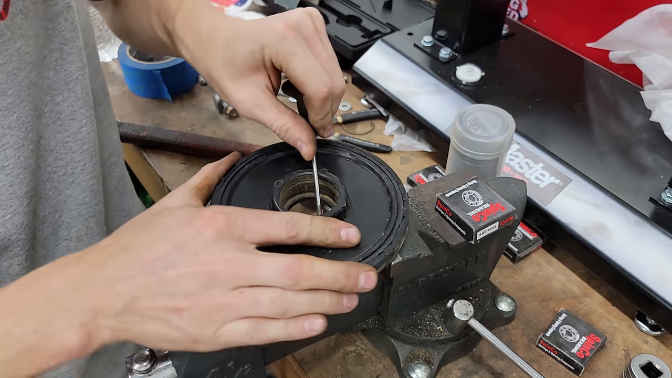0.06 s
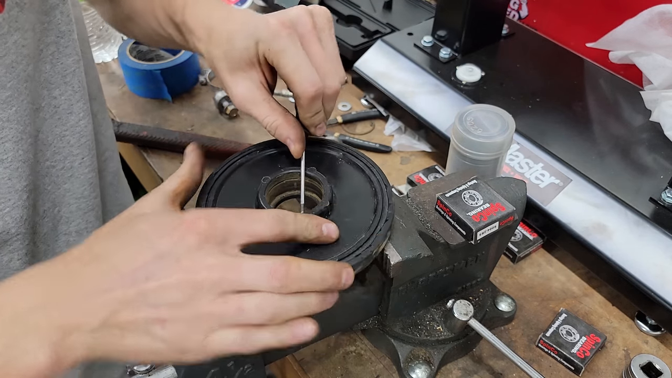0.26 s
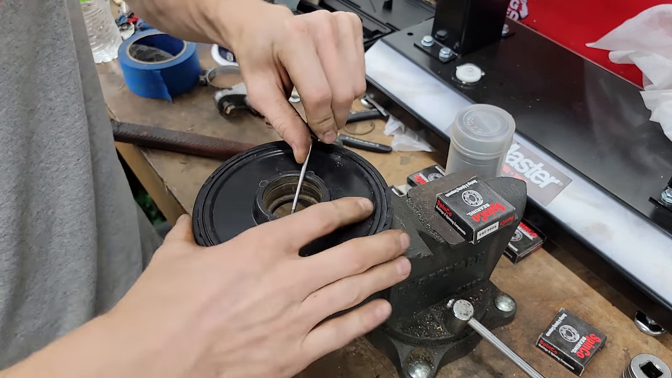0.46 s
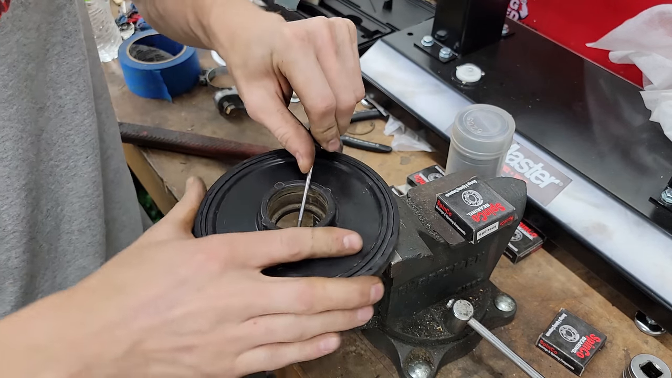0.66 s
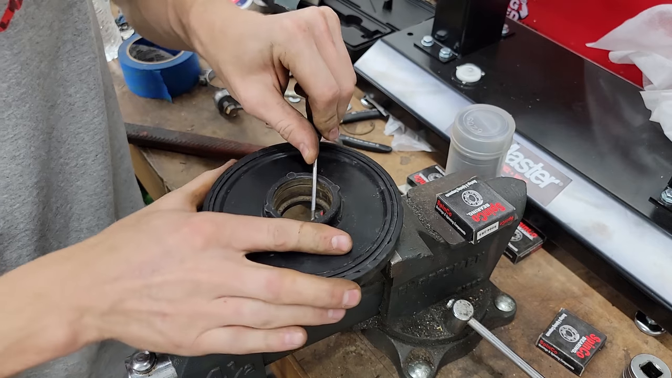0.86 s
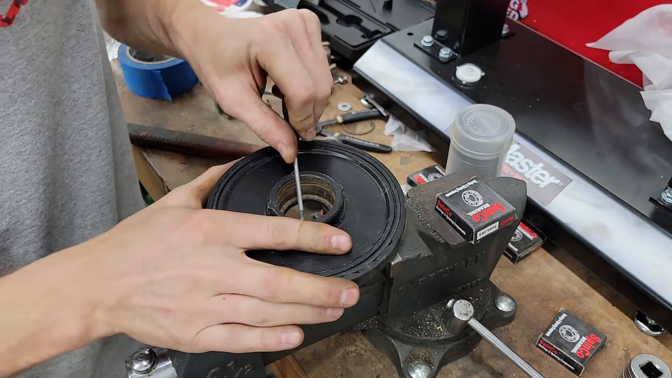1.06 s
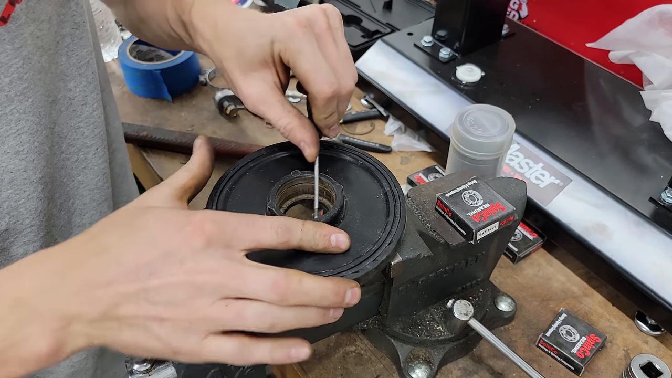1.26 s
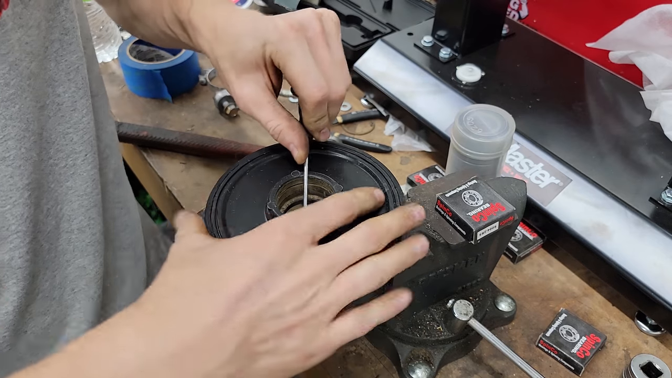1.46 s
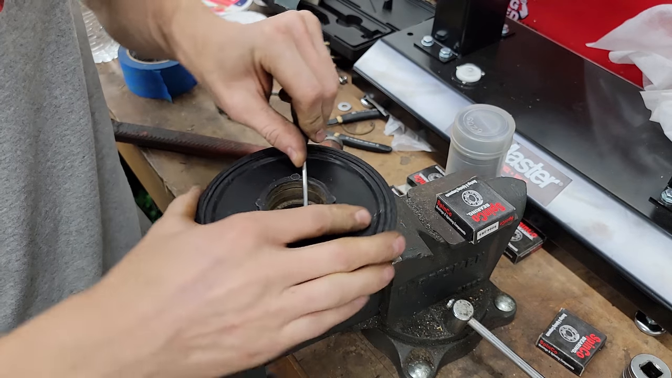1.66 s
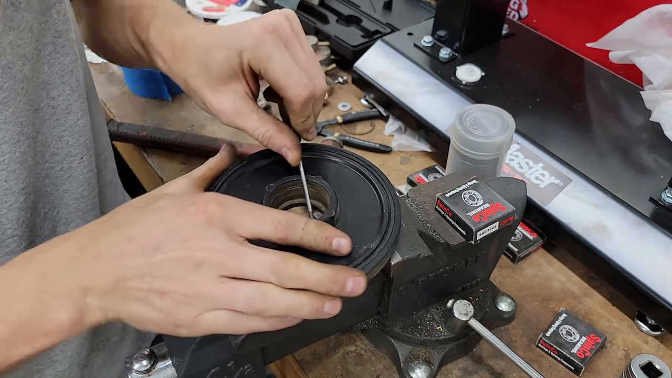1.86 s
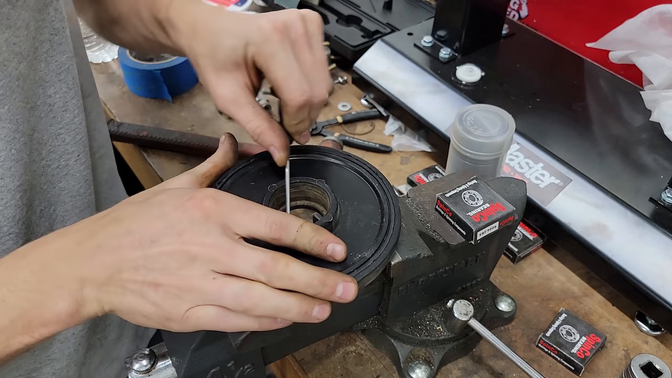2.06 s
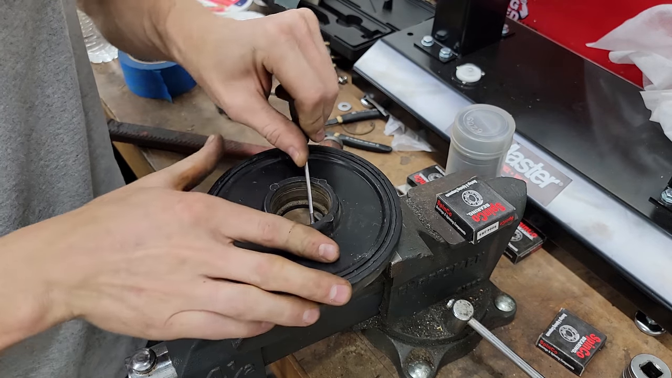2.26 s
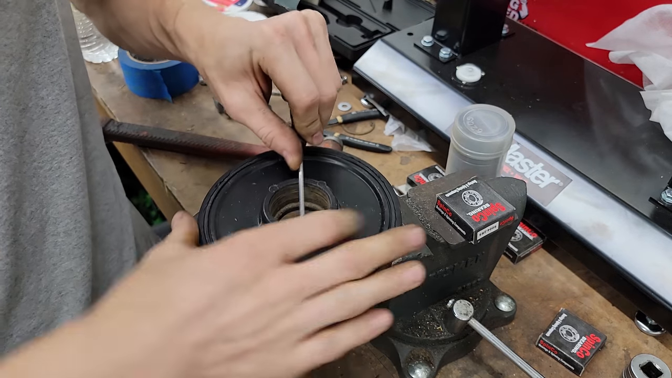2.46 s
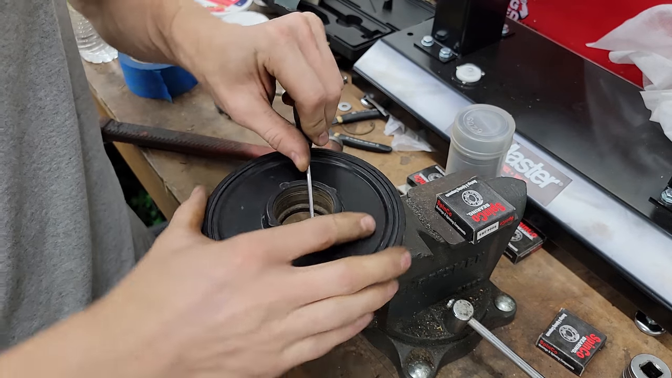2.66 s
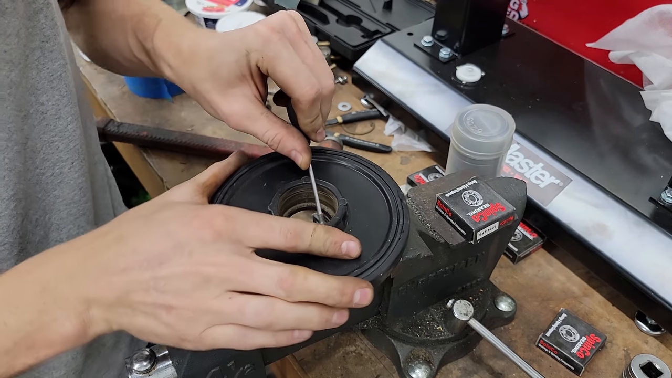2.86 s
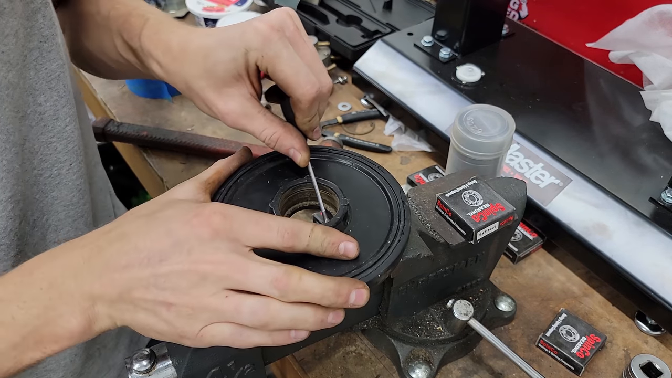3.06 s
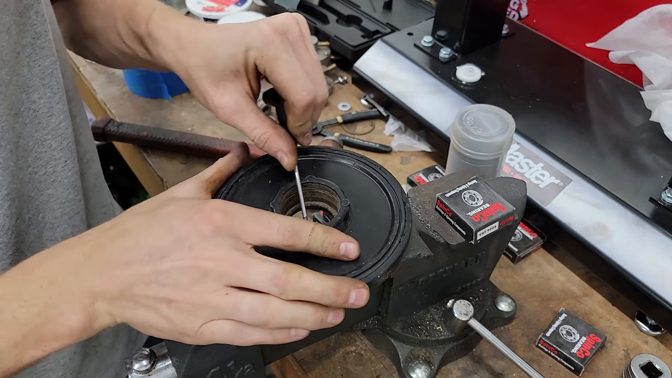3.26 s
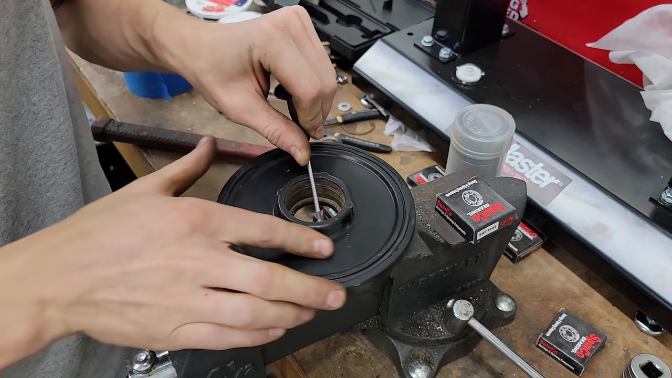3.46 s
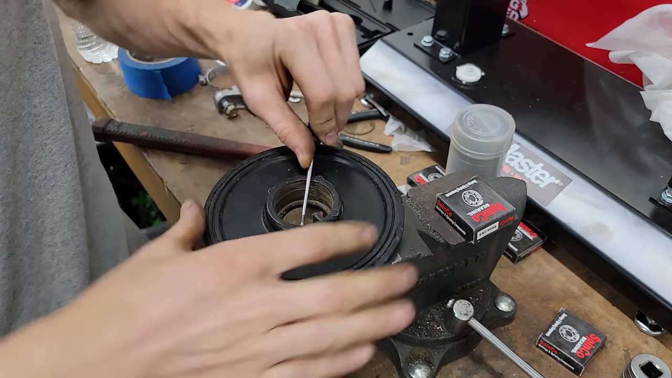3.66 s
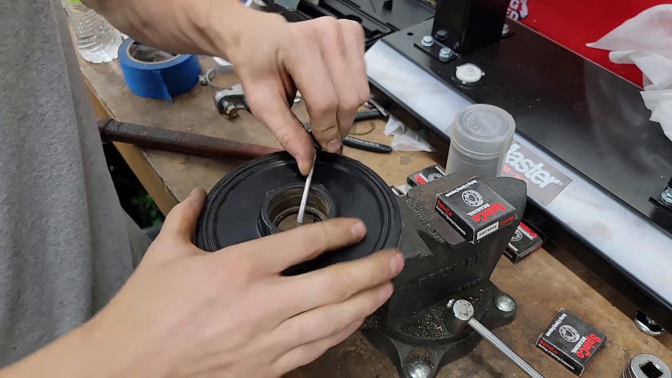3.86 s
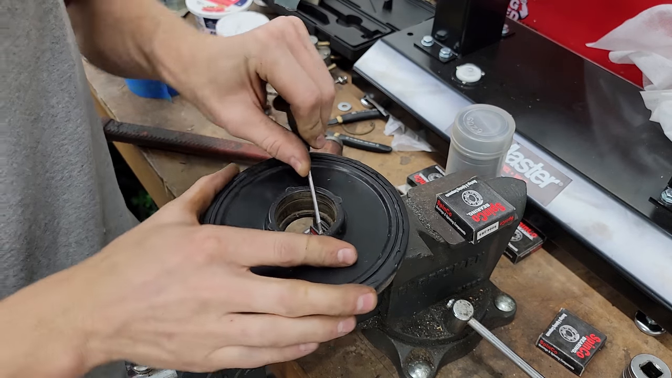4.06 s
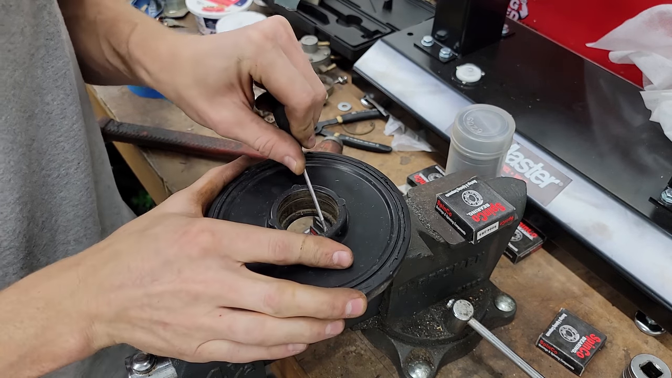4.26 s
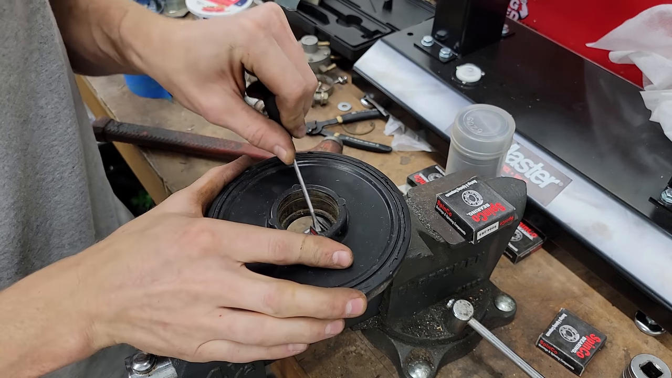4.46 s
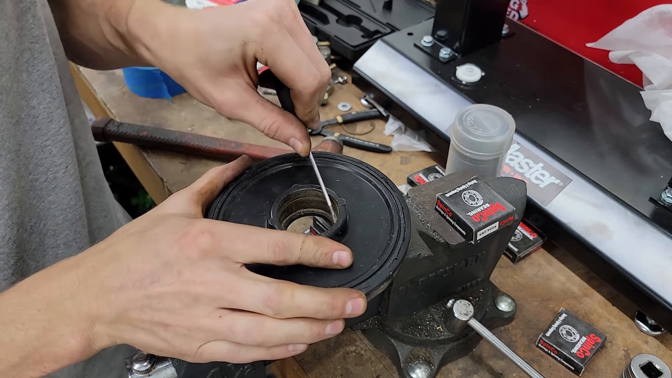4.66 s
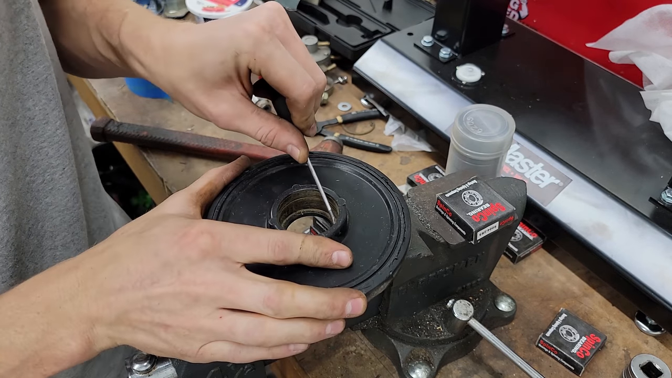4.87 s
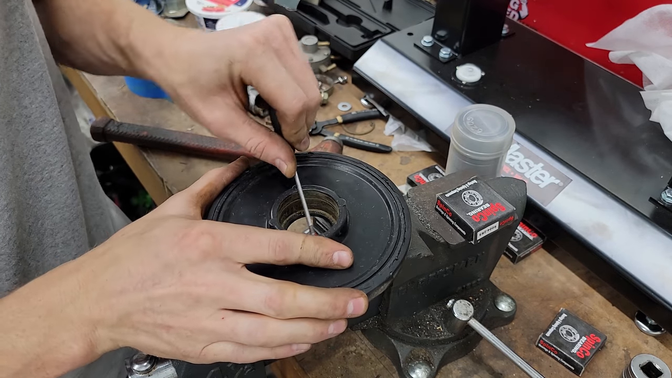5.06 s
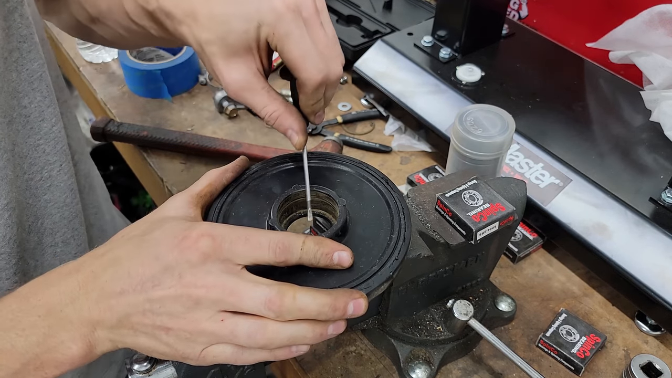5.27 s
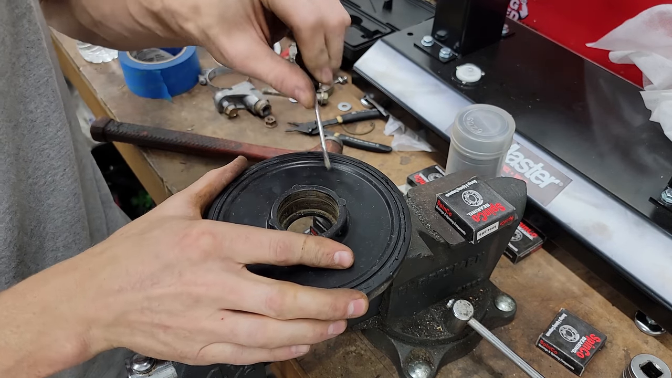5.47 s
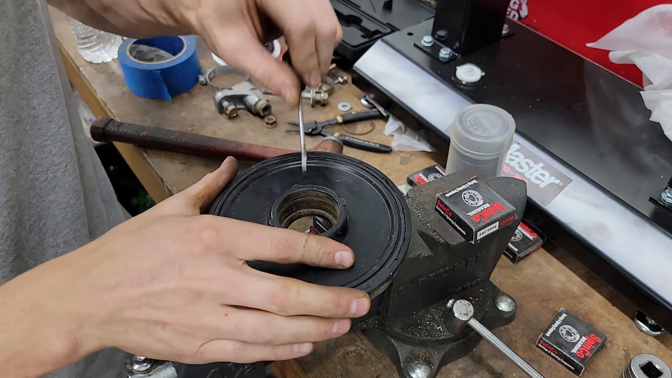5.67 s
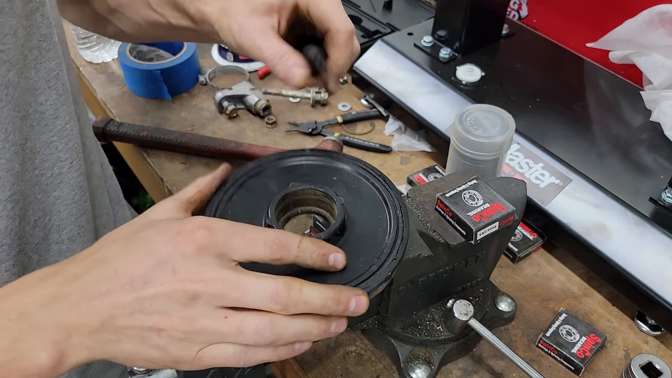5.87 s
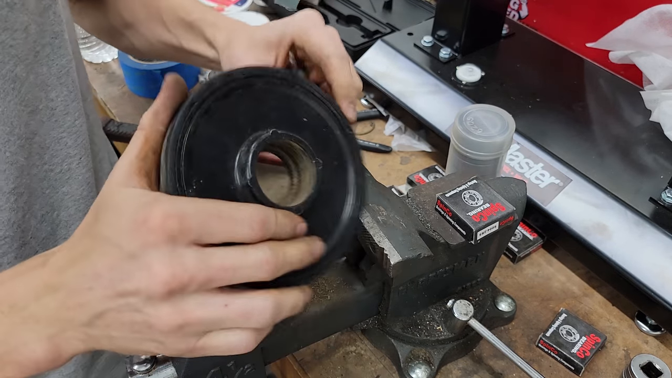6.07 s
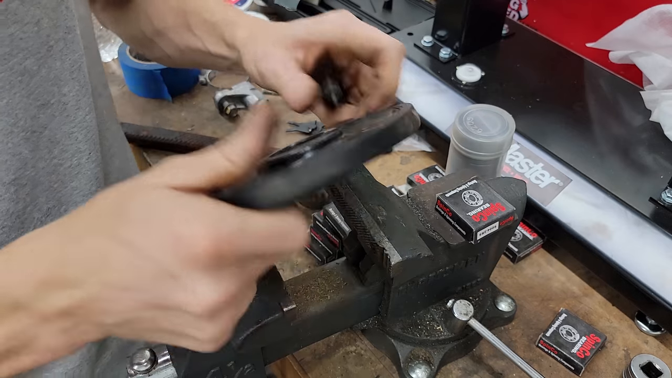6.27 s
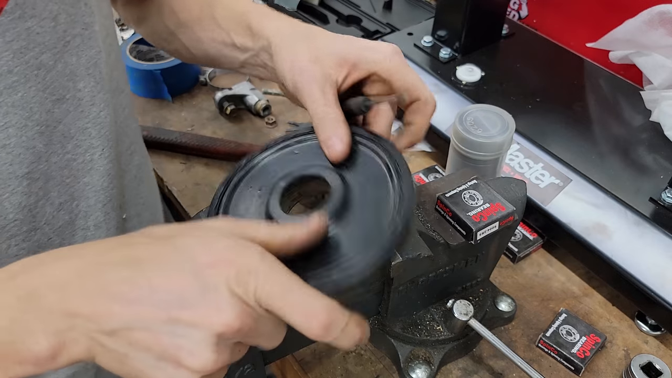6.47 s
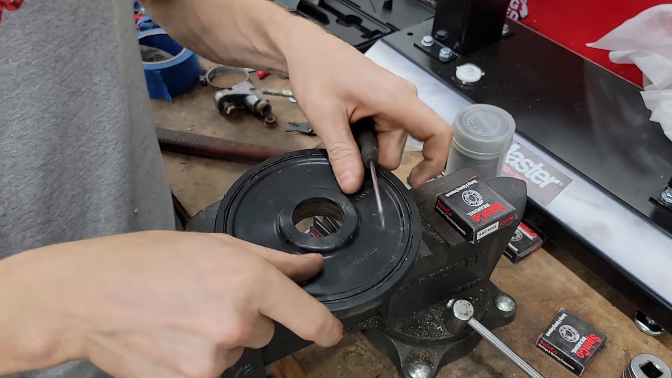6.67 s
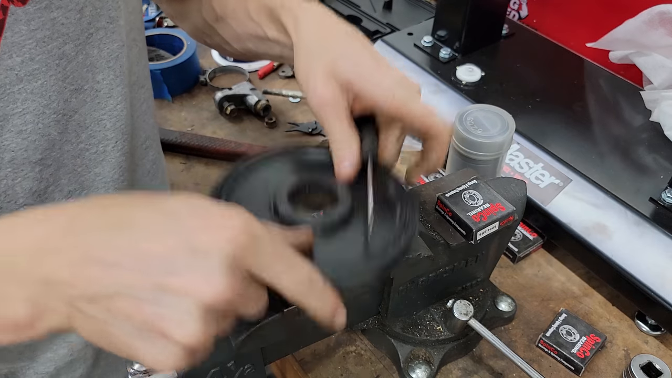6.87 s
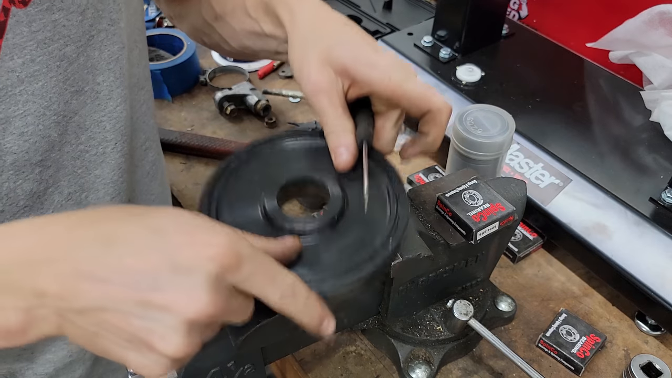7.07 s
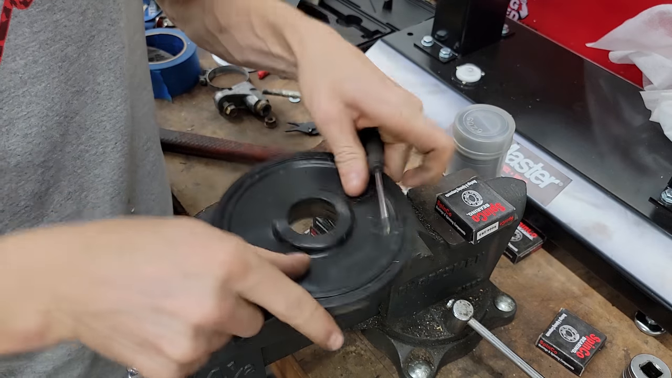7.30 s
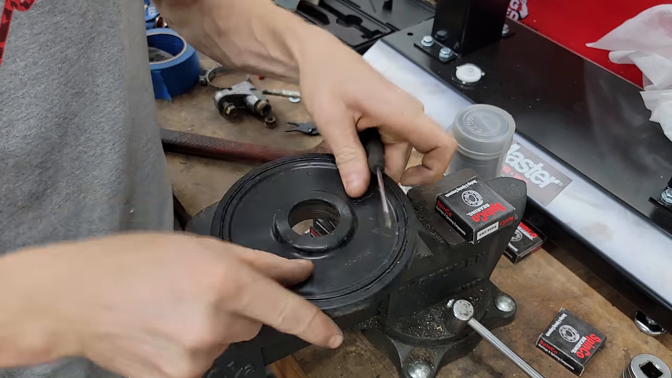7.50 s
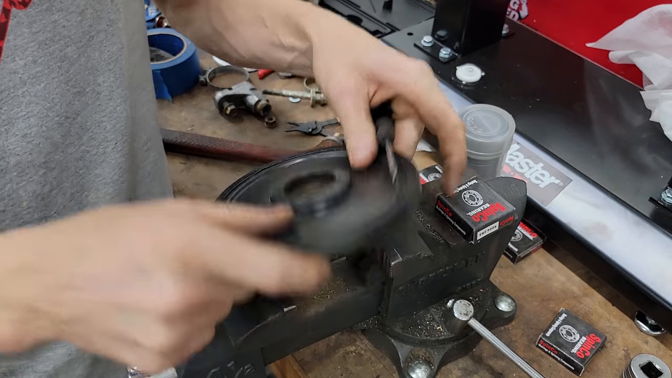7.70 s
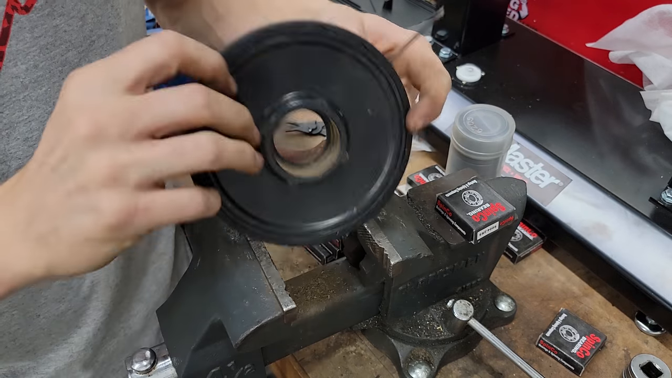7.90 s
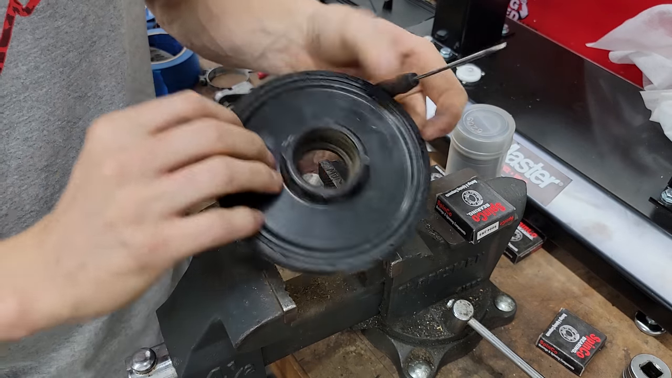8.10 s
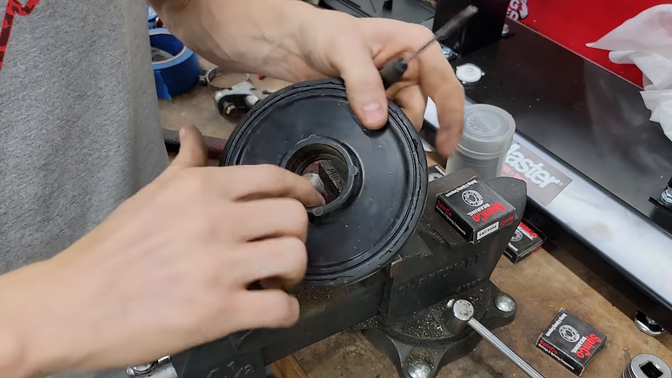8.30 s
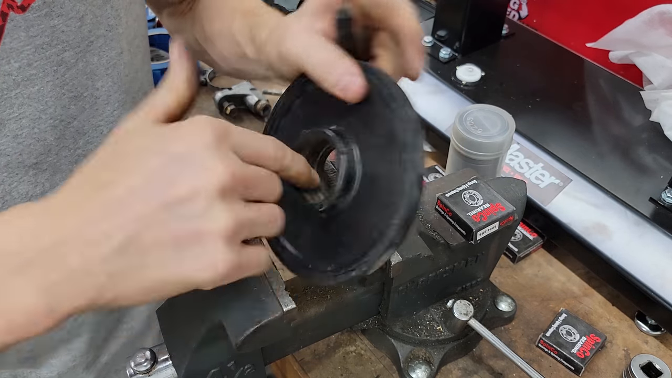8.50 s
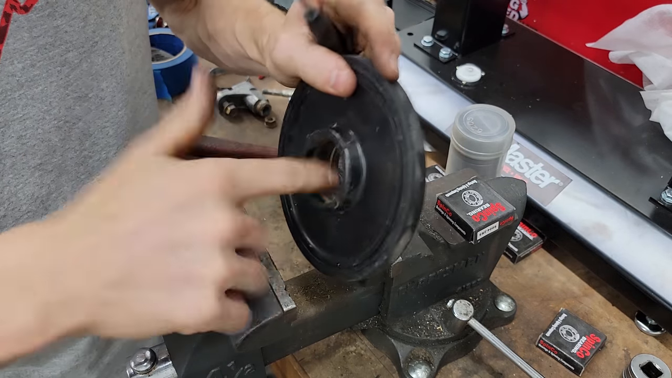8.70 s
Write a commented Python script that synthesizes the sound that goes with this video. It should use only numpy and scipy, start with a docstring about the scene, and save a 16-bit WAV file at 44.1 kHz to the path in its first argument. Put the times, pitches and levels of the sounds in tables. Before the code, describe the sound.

A quiet, echoing workshop with low rumble and faint hiss, heard close in stereo. From 0 to 4 seconds a screwdriver tip drags round a heavy wheel's greasy bore: soft low grinding strokes, thin hissy scuffs and small ticks, clearer at 0.16 and 1.93. Dull bumps come at 0.37 and 1.66. A muffled distant engine drones around 180 hertz from 0.2, pauses briefly near 1.5, drops in pitch at 2 and fades after 3. Sparse ticks, scuffs and faint metallic rings continue to 5.2, with a thump at 5.0. Two bright shank taps ring at 5.5 and 5.7. Fingers whisper around 6.1 to 6.4, then the wheel clanks on the vise at 6.48. Four hard, loud knocks with tight clattering contacts and bench boom land at 6.88, 7.08, 7.28 and 7.47, echoing about a second. Soft thumps at 7.77 and 8.29 precede dry finger slides to the end.

```python
"""In an echoing workshop, a screwdriver scrapes and ticks round the greasy bore of a heavy idler wheel.
A hand turns the wheel on a bench vise; the shank taps the hub twice, then the wheel is knocked four times.
Knocks, taps and ticks are short cracks plus ringing modes; scrapes and fingers are noise made of tiny slips.
A far engine, a sum of wavering sine waves over a rumble, drones and slows down; steady noise is the air."""
import sys
import numpy as np
from scipy import signal
from scipy.fft import rfft, irfft, next_fast_len
from scipy.io import wavfile
from scipy.ndimage import map_coordinates

SR = 44100
rng = np.random.default_rng(int(sys.argv[2]) if len(sys.argv) > 2 else 0)


def transcribe(u):
    """Save the signal u as a 16-bit wav file named by the first command-line argument.

    u: samples, shape (n,) or (channels, n), limited to [-1, 1]; the rate is SR.
    q: integer samples, one column per channel.
    """
    v = np.clip(np.atleast_2d(u).T, -1, 1)
    q = np.round(v * 32767).astype(np.int16)
    wavfile.write(sys.argv[1], SR, q)


N = 385434

# Levels in these tables and settings come before the gains that scene() gives each layer.
# A t60 is the time a sound takes to fall by 60 dB. Colours are frequency curves with relative levels.

# Steady noise of the quiet shop: (frequency [Hz], level [dB per Hz])
AIR_COLOUR = [(20, 2.5), (48, 1.5), (66, 0), (95, -5.5), (160, -19), (300, -19.5), (620, -24), (760, -17),
              (950, -25), (2300, -33), (4000, -39.5), (6300, -37.5), (11000, -46), (16000, -50.5)]
AIR_DB = -61
# Pulls of the far engine: (start [s], length [s], level [dB], fade [dB/s])
ENGINE_PULLS = [(.17, 1.24, -48, 1.5), (1.66, .32, -56, 0), (2.0, .9, -59, 3)]
PULL_RISE_S, PULL_T60_S = .33, .9
# Tones of the engine: (share of the strongest tone's pitch, level [dB])
ENGINE_ORDERS = [(.31, -16), (.69, -13), (1, 0), (1.187, -13), (1.37, -21), (2.08, -31)]
# The strongest tone sags slowly, then settles at a lower speed
ENGINE_HZ, ENGINE_SAG_HZ_PER_S = 180.5, 3.4
SLOWS_AT_S, SLOWING_S, SLOW_HZ = 2.02, .22, 144
LEAVES_AT_S, LEAVING_DB_PER_S = 3.1, 9  # the engine's rumble fades

# How long the workshop echoes: (frequency [Hz], t60 [s])
ROOM_T60 = [(100, 1.1), (260, .85), (700, .68), (1200, .7), (1840, .85), (4000, .87), (7000, .7),
            (12800, .48)]
# How strongly it echoes: (frequency [Hz], echo level [dB])
ROOM_COLOUR = [(60, -5), (200, -9.5), (500, -13), (700, -15), (950, -16), (1500, -13), (2500, -13.5),
               (4000, -11), (6000, -11.5), (13000, -15)]
# Stereo width of scattered sound: (frequency [Hz], side over mid [ratio])
STEREO_WIDTH = [(60, 0.079), (200, .15), (320, 0.72), (700, 1), (2000, 1)]
# Tilt of the microphones to the left: (frequency [Hz], left minus right [dB])
MIC_LEAN = [(60, -6), (110, 0), (200, -3), (380, 3.5), (700, -2), (1290, -0.5), (2380, 3.5), (4400, -1.5),
            (8120, -1), (15000, -0.5)]
TOP_HZ = 16100  # nothing is kept above this

# The hand lands on the wheel or shifts its grip, a soft thump: (time [s], level [dB])
HAND_THUMPS = [(1.44, -38), (2.5, -42.5), (3.104, -50), (3.745, -40.5), (5.0, -36.5), (7.765, -37),
               (8.289, -35.5)]
# A contact shakes the bench too: boom of a 0 dB contact, and boom dB per dB of contact level
BOOM_DB, BOOM_FOLLOWS = -20, .62
TAP_BOOM_DB = -10.5  # the light shank shakes it less
# Fingers slide over the wheel: (start [s], length [s], level [dB])
FINGER_SLIDES = [(6.11, .04, -70.5), (6.18, .035, -69), (6.33, .06, -70), (6.41, 0.04, -64),
                 (8.425, 0.13, -59.5), (8.65, .075, -59.5)]
SLIDE_RISE_S, SLIDE_SAG_DB_PER_S, SLIDE_T60_S = .035, 20, 0.084
# Colour of skin on the wheel: (frequency [Hz], level [dB per Hz])
SKIN_COLOUR = [(600, -34.5), (1500, -9.5), (4500, -11), (7000, 0.5), (8700, 0.5), (11000, -7.5),
               (14500, -0.5), (16000, -5)]

# Ringing modes of the wheel on its vise, damped by the hand: (frequency [Hz], level [dB], t60 [s])
WHEEL_MODES = [(266, 2.5, 0.11), (376, -1, 0.12), (521, 3.5, 0.078), (795, -2.5, .1), (1087, 3, 0.11),
               (1500, -1, 0.1), (1717, -7.5, 0.028), (2397, -10.5, 0.08), (2670, -7.5, 0.055),
               (3530, -18.5, 0.13), (3710, -3, 0.15), (4553, -14.5, .06), (6200, -11, 0.036)]
# The wheel rings on freely as the hand lifts: (time [s], frequency [Hz], level [dB], t60 [s])
FREE_RINGS = [(3.43, 1330, -55, .25), (3.43, 3660, -62, .4), (3.85, 3660, -71, .6), (4.5, 1090, -58, .18),
              (5.151, 1090, -53, .2)]
# The wheel shifts and bumps on the vise:
# (time [s], level [dB], thud against clank [dB], treble against clank [dB])
BUMPS = [(0.213, -42.5, 8, -12), (0.316, -59.5, 20.5, -27), (0.372, -32, 9, -16.5), (1.445, -52, 12.5, -7),
         (1.662, -33, -8.5, -14.5), (1.685, -48, 8, -5.5), (3.433, -48, 13, -2.5), (3.85, -41.5, 5.5, -5.5),
         (3.872, -39.5, -1, -13), (3.903, -47.5, 5, -13), (4.997, -38, 4.5, -21), (6.051, -48.5, 2, -46),
         (6.479, -17.5, -3.5, -7.5), (6.499, -35, 10, -1), (6.548, -34.5, 3.5, -11), (6.629, -31, 0.5, -18),
         (8.291, -53, 5, -29.5)]
BUMP_CLANG_DB, BUMP_EDGE_DB = -2.5, -3.5  # how a bump's treble divides between clang and edge
# The wheel is knocked on the vise: it grazes, lands on one jaw and slaps onto the other.
# (landing time [s], graze ahead [s], slap after [s], graze level [dB], landing level [dB],
# slap level [dB], extra thud [dB])
BLOWS = [(6.8786, 0.012, 0.0095, -20.5, -6, -9.5, 1), (7.0775, 0.0035, 0.0084, -35, -13.5, -13, 3.5),
         (7.279, .0036, 0.0039, -11.5, -8.5, -16, 2.5), (7.4675, .0031, .0052, -16.5, -6.5, -7, -2)]
# Hardness of graze, landing and slap against the 1.3 kHz clank: (thud [dB], clang [dB], edge [dB])
BLOW_STAGES = [(-12, -7.5, -1.5), (-6.5, -3, -7), (-3.5, 0.5, 8)]
# Colour of wheel on vise: (frequency [Hz], level [dB per Hz])
BUMP_COLOUR = [(30, -21.5), (65, -17), (160, -12.5), (260, -3), (520, 0.5), (730, -1.5), (930, -10),
               (1100, -7), (1600, -8), (3200, -10), (4400, -17), (9000, -27), (11000, -35), (16000, -36.5)]

# The shank taps the hub: (time [s], level [dB], thud [dB], clang [dB], edge [dB])
HUB_TAPS = [(5.5129, -16, -4.5, 0.5, -4), (5.6979, -22.5, -0.5, 3, 2.5)]
# Colour of shank on hub: (frequency [Hz], level [dB per Hz])
TAP_COLOUR = [(60, -40), (120, -23), (600, -21), (850, -9), (1100, -.5), (1800, -2), (2600, -4.5),
              (3400, -2), (4100, -3.5), (5000, -11.5), (6100, -10), (8300, -21), (10000, -31), (16000, -40)]
# The tip catches in the groove:
# (time [s], level [dB], thud against pitch [dB], edge against pitch [dB], pitch [Hz])
TICKS = [(0.159, -27, -10, -8, 1600), (0.984, -50, 4, -11.5, 1150), (1.159, -57.5, -16, 1, 1480),
         (1.354, -52.5, 0, -5, 1070), (1.381, -52.5, 6, 9, 1310), (1.9255, -35, -12, -17, 1500),
         (2.115, -51, -34, 1, 1870), (2.55, -56, -12, -21.5, 1480), (2.635, -42, -23, -43, 1470),
         (2.648, -41.5, -10, -44, 1390), (3.105, -40.5, 1.5, 6, 1420), (3.114, -37.5, -4.5, -13, 850),
         (3.135, -61.5, -1, 25, 1100), (3.189, -58.5, -10, -21, 1500), (3.278, -52.5, -35, -12, 1460),
         (3.5213, -51, -22, -16, 1380), (3.539, -48, -5, -24.5, 1290), (4.407, -42.5, -25, -45, 1090),
         (4.434, -58.5, -18, -19, 1140), (4.506, -50.5, -25, -26, 1000), (4.537, -52.5, -22, -18, 1090),
         (4.602, -59, -24, -13, 1410), (4.997, -30.5, -20.5, -14.5, 800), (5.151, -40, -23, -19.5, 1213),
         (6.277, -41.5, -10, -2.5, 904)]
# Colour of tip on groove: (frequency [Hz], level [dB per Hz])
TICK_COLOUR = [(60, -21.5), (250, 7), (1300, 2), (1900, 5), (2900, -2), (4000, -2), (7500, -10),
               (15000, -36)]
TICK_CLANG_DB, CLANG_FOLLOWS = -9, 0.14  # a tick's clang, and its rise in dB per dB of edge
# The tip skids as it catches: level against the tick's edge, and its ceiling
SKID_DB, SKID_MOST_DB = 0.5, -53
SKID_RISE_S, SKID_S, SKID_T60_S = .02, .028, .1
SKID_LEAD_S = .008  # the skid begins just before the tip catches
# The wheel turns under the tip: (start [s], length [s], hiss level [dB], grinding level [dB])
STROKES = [(0.086, 0.4, -78.5, -53.5), (0.442, .4, -68, -58), (1.565, 0.31, -66, -53.5),
           (2.547, 0.24, -62, -52.5), (3.32, 0.17, -69, -60), (3.774, 0.3, -68.5, -53.5)]
STROKE_RISE_S, STROKE_SAG_DB_PER_S, STROKE_T60_S = 0.11, 28.5, 0.53
RESTING_S, RESTING_DB = 4.1, -72  # the tip also rubs lightly until this time
# Short scuffs as the tip is moved about: (middle [s], peak level [dB], length [s])
SCUFFS = [(0.094, -58.5, 0.078), (2.482, -55, 0.083), (3.3, -57, .03), (3.414, -52.5, 0.037),
          (3.746, -60, 0.035), (4.342, -62.5, 0.077), (4.703, -65, 0.069), (4.923, -53.5, 0.032),
          (5.127, -55, 0.082)]
# Low part of the scrape: (frequency [Hz], level [dB per Hz])
GRIND_COLOUR = [(150, -17), (260, 0), (500, -5.5), (800, -11.5), (1200, -10.5), (2000, -21), (3500, -32.5),
                (5000, -26), (8000, -69)]
# High part of the scrape: (frequency [Hz], level [dB per Hz])
HISS_COLOUR = [(1200, -26.5), (2500, 4), (3600, -9), (5000, -2.5), (6000, 3), (8500, -3), (11000, -8.5),
               (14500, -5), (16000, -5.5)]
# Ringing of the dragged blade: (frequency [Hz], width [Hz], level [dB])
BLADE_MODES = [(1800, 330, 0), (3510, 360, 10.5), (4057, 110, 4), (6130, 100, -5.5), (8450, 140, -10.5)]


def amp(db):
    """Decibels to gain."""
    return 10 ** (np.asarray(db) / 20)


def unit(x):
    """Scaled to rms 1."""
    return x / np.sqrt(np.mean(x ** 2) + 1e-20)


def unit_energy(x):
    """Scaled to energy 1 per channel, on average."""
    return unit(x) / np.sqrt(x.shape[-1])


def along(points, hz):
    """Read a curve of (Hz, value) points on a log frequency axis."""
    f, value = np.transpose(points)
    return np.interp(np.log(hz + 1), np.log(f), value)


def wobble(rate):
    """A smooth random curve, with this many knots a second."""
    knots = rng.standard_normal(int(N * rate / SR) + 4)
    return map_coordinates(knots, [np.arange(N) * rate / SR])


def filtered(x, response):
    """Multiply the spectrum of x by a response of frequency."""
    n = x.shape[-1]
    size = next_fast_len(n + 8192)
    spectrum = rfft(x, size) * response(np.fft.rfftfreq(size, 1 / SR))
    return irfft(spectrum, size)[..., :n]


def struck(x, colour, size=8192):
    """Colour x with a filter that never answers early, so that attacks stay sharp."""
    gain = amp(along(colour, np.fft.rfftfreq(size, 1 / SR)))
    # folding the cepstrum gives the minimum-phase filter
    cepstrum = irfft(np.log(np.maximum(gain, 1e-4)))
    cepstrum[1:size // 2] *= 2
    cepstrum[size // 2 + 1:] = 0
    impulse = irfft(np.exp(rfft(cepstrum)))
    return signal.fftconvolve(x, impulse[None], axes=1)[:, :x.shape[1]]


def scattered(n):
    """White stereo noise from all sides: alike in the bass, unrelated in the treble."""
    mid, side = rng.standard_normal((2, n))
    side = filtered(side, lambda hz: along(STEREO_WIDTH, hz))
    left_right = np.array([mid + side, mid - side])
    return unit(filtered(left_right, lambda hz: 1 / np.hypot(1, along(STEREO_WIDTH, hz))))


def add(out, s, x):
    """Mix x into out from time s."""
    start = round(s * SR)
    out[:, start:start + x.shape[1]] += x[:, :N - start]


def pressed(start, length, rise_s, sag_db_per_s, t60):
    """Gain of one push: it rises, sags while held and dies away when let go."""
    t = np.maximum(np.arange(N) / SR - start, 0)
    since_release = np.maximum(t - length, 0)
    fall_db = -sag_db_per_s * t - 60 * since_release / t60
    return np.minimum(t / rise_s, 1) * amp(np.maximum(fall_db, -200))


def friction(colour, slips_per_s, slip_share, uneven_db):
    """Tiny slips of random size over a smooth rub, under an unsteady pressure."""
    slip_size = amp(np.minimum(4 * rng.standard_exponential(N), 10))
    slips = (rng.random(N) < slips_per_s / SR) * slip_size
    share = np.clip(slip_share, 0, 1)
    # each slip dies away with a time constant of 2 ms
    bursts = unit(signal.lfilter([1], [1, -np.exp(-1 / (0.002 * SR))], slips))
    drag = scattered(N) * (np.sqrt(1 - share) + np.sqrt(share) * bursts)
    return unit(filtered(drag * amp(uneven_db * wobble(45)), colour))


def air(db):
    """The steady rumble and hiss of the quiet shop: coloured noise."""
    return amp(AIR_DB + db) * unit(filtered(scattered(N), lambda f: amp(along(AIR_COLOUR, f))))


def engine(db, rumble_db):
    """Only the engine's low tones pass the walls, each wavering on its own, over a dull rumble."""
    t = np.arange(N) / SR
    cruising_hz = ENGINE_HZ - ENGINE_SAG_HZ_PER_S * t
    slowing = np.exp(-np.maximum(t - SLOWS_AT_S, 0) / SLOWING_S)
    pitch = SLOW_HZ + (cruising_hz - SLOW_HZ) * slowing
    phase = 2 * np.pi * np.cumsum(pitch) / SR
    load = sum(amp(pull_db) * pressed(s, length, PULL_RISE_S, fade, PULL_T60_S)
               for s, length, pull_db, fade in ENGINE_PULLS)
    drone = sum(amp(order_db + .6 * wobble(5)) * np.sin(share * phase + .12 * wobble(6))
                for share, order_db in ENGINE_ORDERS)
    # (frequency [Hz], level [dB per Hz])
    rumble_colour = [(50, -18), (110, 4), (220, 2), (330, -20.5), (700, -14), (1500, -69.5)]
    rumble = unit(filtered(scattered(N), lambda f: amp(along(rumble_colour, f))))
    rumble_level = rumble_db - LEAVING_DB_PER_S * np.maximum(t - LEAVES_AT_S, 0)
    return amp(db) * load * unit(drone) + amp(rumble_level) * rumble


def workshop(x):
    """Bare walls answer after a few milliseconds; each frequency dies at its own speed."""
    hz, t, noise = signal.stft(scattered(SR), SR, nperseg=256)
    t60 = along(ROOM_T60, hz)[:, None]
    fading = amp(-60 * t / t60) / np.sqrt(t60) * (1 - np.exp(-t / .009))
    tail = signal.istft(noise * fading, SR, nperseg=256)[1]
    return signal.fftconvolve(x, struck(unit_energy(tail), ROOM_COLOUR), axes=1)[:, :N]


def moving_echo(x):
    """The wheel is held differently for every blow, so each wakes its own pattern of echoes."""
    blow_starts = [s - ahead for s, ahead, *rest in BLOWS]
    piece = np.searchsorted(blow_starts, np.arange(N) / SR)
    return sum(workshop(x * (piece == k)) for k in range(len(BLOWS) + 1))


def shakes():
    """(time [s], level [dB]) of all that shakes the bench: bumps, blows, taps and the hand."""
    bumps = [row[:2] for row in BUMPS]
    blows = [(s, max(levels)) for s, ahead, after, *levels, extra_db in BLOWS]
    heavy = [(s, BOOM_DB + BOOM_FOLLOWS * db) for s, db in bumps + blows]
    light = [(s, BOOM_DB + TAP_BOOM_DB + BOOM_FOLLOWS * db) for s, db, *hardness in HUB_TAPS]
    return heavy + light + list(HAND_THUMPS)


def bench_boom(db, rise, t60):
    """Bending waves cross the bench top: the higher ones arrive first, the deepest last."""
    out, t = np.zeros((2, N)), np.arange(SR // 3) / SR
    bands = [(287, -11.5), (207.0, -4), (145, -3.5), (93, 0.0), (45, -2.5)]  # (frequency [Hz], level [dB])
    for s, blow_db in shakes():
        noise = scattered(len(t))
        for hz, band_db in bands:
            wave = filtered(noise, lambda f: 1 / (1 + (5 * (f - hz) / hz) ** 4))
            # rise and t60 hold at 100 Hz; higher bands are quicker
            swell = 1 - np.exp(-(t * hz / (100 * rise)) ** 2)
            decay = amp(-60 * t / t60 * np.sqrt(hz / 100))
            boom = unit_energy(wave * swell * decay) * np.sqrt(SR / 100)
            add(out, s, amp(db + blow_db + band_db) * boom)
    return out


def fingers(db):
    """Dry skin whispers over the wheel's face: friction with many small slips."""
    pressure = sum(amp(slide_db) * pressed(s, length, SLIDE_RISE_S, SLIDE_SAG_DB_PER_S, SLIDE_T60_S)
                   for s, length, slide_db in FINGER_SLIDES)
    rub = friction(lambda f: amp(along(SKIN_COLOUR, f)), slips_per_s=1500, slip_share=.1, uneven_db=2.5)
    return amp(db) * pressure * rub


def free_ring():
    """Single modes sing on while no palm damps the wheel; the dragging tip makes them flutter."""
    out, t = np.zeros((2, N)), np.arange(SR // 2) / SR
    for s, hz, db, t60 in FREE_RINGS:
        flutter = .5 * wobble(70)[:len(t)]
        tone = np.sin(2 * np.pi * hz * t + flutter + rng.normal(0, 1, (2, 1)))
        add(out, s, amp(db - 60 * t / t60) * (1 - np.exp(-t / .002)) * tone)
    return out


def contacts(rows, colour, crack_t60, crack_db, ring_db, bench_db, bench_t60):
    """Each contact is a push and a brief crack, the wheel's ring, and scatter from the cluttered bench."""
    out, t = np.zeros((2, N)), np.arange(SR // 6) / SR
    hz, mode_db, t60 = np.transpose(WHEEL_MODES)[:, :, None]
    # each mode reaches the two microphones with its own phases
    mic_phase = rng.normal(0, 1, (2, len(WHEEL_MODES))) * along(STEREO_WIDTH, hz[:, 0])
    at_mics = np.exp(1j * mic_phase)
    for s, db, thud_db, clang_db, edge_db, *pitch in rows:
        # grip and point of contact change the strength and tuning of every mode
        tuned = hz * rng.normal(1, .009, hz.shape)
        strength_db = rng.normal(0, 3.5, hz.shape)
        modes = amp(mode_db + strength_db - 60 * t / t60) * np.exp(2j * np.pi * tuned * t)
        ring = unit_energy((at_mics @ modes).imag)
        noise = scattered(len(t))
        crack = unit_energy(noise * amp(-60 * t / crack_t60))
        bench = unit_energy(noise[:, ::-1] * amp(-60 * t / bench_t60) * (1 - np.exp(-t / 0.0046)))
        push = t == 0
        blow = push + amp(crack_db) * crack + amp(ring_db) * ring + amp(bench_db) * bench
        blow = unit_energy(struck(blow, colour)) * np.sqrt(SR / 100)
        # soft contacts are mostly thud, hard ones have a bright edge
        centre = pitch[0] if pitch else 1300
        hardness = [(.28 * centre, thud_db), (.85 * centre, 0), (1.25 * centre, 0),
                    (2.1 * centre, clang_db), (7500, edge_db)]
        add(out, s, amp(db) * struck(blow, hardness))
    return out


def wheel_contacts():
    """Every meeting of wheel and vise: the single bumps, and three contacts for each blow."""
    rows = [(s, db, thud_db, treble_db + BUMP_CLANG_DB, treble_db + BUMP_EDGE_DB)
            for s, db, thud_db, treble_db in BUMPS]
    for s, ahead, after, *levels, extra_db in BLOWS:
        times = (s - ahead, s, s + after)
        for when, db, (thud_db, clang_db, edge_db) in zip(times, levels, BLOW_STAGES):
            rows.append((when, db, thud_db + extra_db, clang_db, edge_db))
    return rows


def tip_contacts():
    """The sharper the tip catches, the more it clangs."""
    return [(s, db, thud_db, TICK_CLANG_DB + CLANG_FOLLOWS * edge_db, edge_db, hz)
            for s, db, thud_db, edge_db, hz in TICKS]


def scrape(grind_db, hiss_db, scuff_db, scuff_grind_db):
    """The tip grinds through grit in long strokes and short scuffs, and sets the blade ringing."""
    t = np.arange(N) / SR
    grind = amp(RESTING_DB) * pressed(0, RESTING_S, STROKE_RISE_S, 0, STROKE_T60_S)
    hiss = 0
    for start, length, high_db, low_db in STROKES:
        push = pressed(start, length, STROKE_RISE_S, STROKE_SAG_DB_PER_S, STROKE_T60_S)
        grind = grind + amp(low_db) * push
        hiss = hiss + amp(high_db) * push
    scuff = sum(amp(db) * np.exp(-np.minimum((2 * (t - s) / length) ** 2, 20))
                for s, db, length in SCUFFS)[None]
    skid = pressed(0, SKID_S, SKID_RISE_S, 0, SKID_T60_S)[None, :SR // 2]
    for s, db, thud_db, edge_db, hz in TICKS:
        skid_db = min(db + edge_db + SKID_DB, SKID_MOST_DB)
        add(scuff, s - SKID_LEAD_S, amp(skid_db) * skid)

    def blade(f):
        """Resonances of the dragged blade lift the friction noise."""
        return 1 + sum(amp(db) / (1 + (2 * (f - hz) / width) ** 2) for hz, width, db in BLADE_MODES)

    low = friction(lambda f: amp(along(GRIND_COLOUR, f)) * blade(f),
                   slips_per_s=280, slip_share=0.27, uneven_db=-2.0)
    high = friction(lambda f: amp(along(HISS_COLOUR, f)) * blade(f),
                    slips_per_s=480, slip_share=.5, uneven_db=1.5)
    low_gain = amp(grind_db) * grind + amp(scuff_grind_db) * scuff
    high_gain = amp(hiss_db) * hiss + amp(scuff_db) * scuff
    return low_gain * low + high_gain * high


def scene():
    """Wheel, screwdriver and fingers in the room, a little earlier on the left, over the background."""
    background = engine(db=0.5, rumble_db=-58.5) + air(db=0.0)
    knocks = contacts(wheel_contacts(), BUMP_COLOUR, crack_t60=0.013, crack_db=10.5, ring_db=-5.5,
                      bench_db=6.5, bench_t60=0.097)
    taps = contacts(HUB_TAPS, TAP_COLOUR, crack_t60=0.0028, crack_db=9.0, ring_db=-6.0,
                    bench_db=-1.5, bench_t60=0.12)
    ticks = contacts(tip_contacts(), TICK_COLOUR, crack_t60=0.016, crack_db=10, ring_db=1.0,
                     bench_db=7, bench_t60=0.068)
    rubbing = scrape(grind_db=-4.5, hiss_db=4.5, scuff_db=-10.0, scuff_grind_db=-10) + fingers(db=4.0)
    wheel = amp(-1) * knocks + bench_boom(db=-8.5, rise=0.016, t60=0.21) + free_ring()
    tip = ticks + rubbing
    echoes = moving_echo(amp(1.0) * wheel + amp(-2.5) * tip) + workshop(amp(-2.5) * taps)
    work = wheel + tip + taps + echoes
    lag_s, sides = .00008, np.array([[1], [-1]])  # the right ear's delay; left is +1, right is -1
    work = filtered(work, lambda hz: amp(sides * along(MIC_LEAN, hz) / 2)
                    * np.exp(1j * np.pi * hz * lag_s * sides))
    return work + background


def record(dry):
    """Peaks round off at full scale; nothing is kept above the band limit."""
    rounded = dry / (1 + np.abs(dry) ** 6) ** (1 / 6)
    return filtered(rounded, lambda hz: hz < TOP_HZ)


dry = scene()
out = record(dry)
transcribe(out)
```